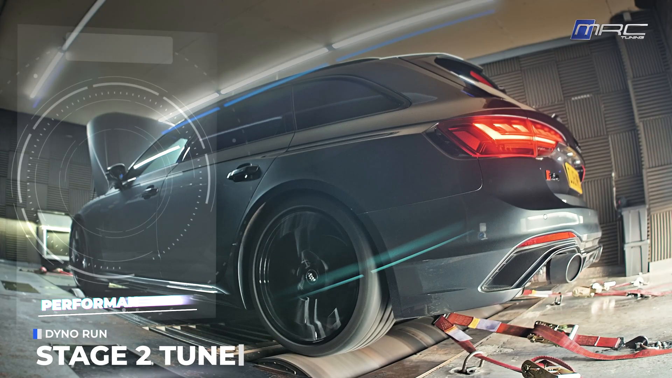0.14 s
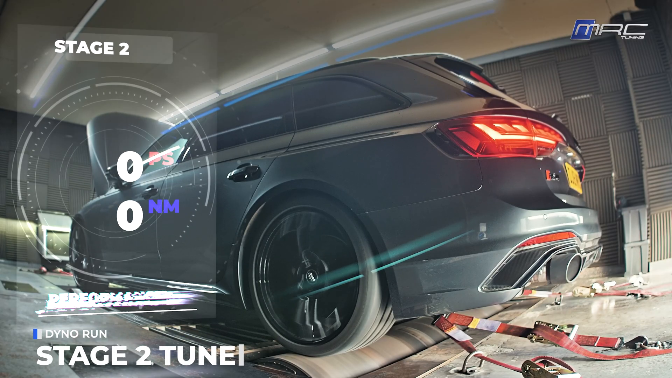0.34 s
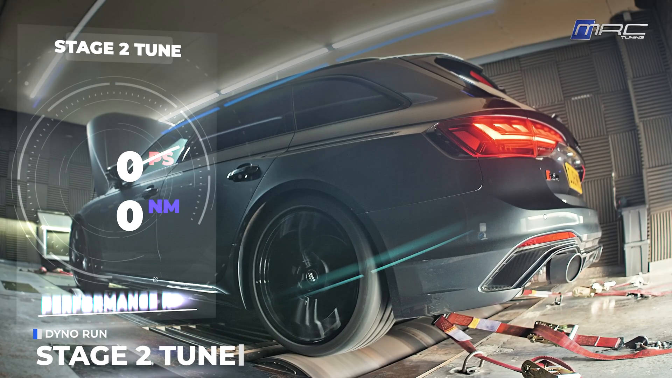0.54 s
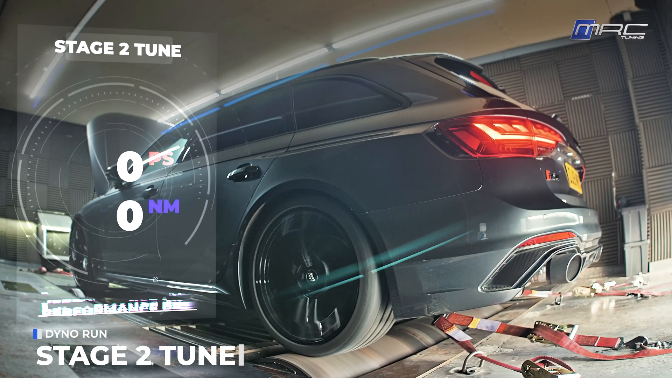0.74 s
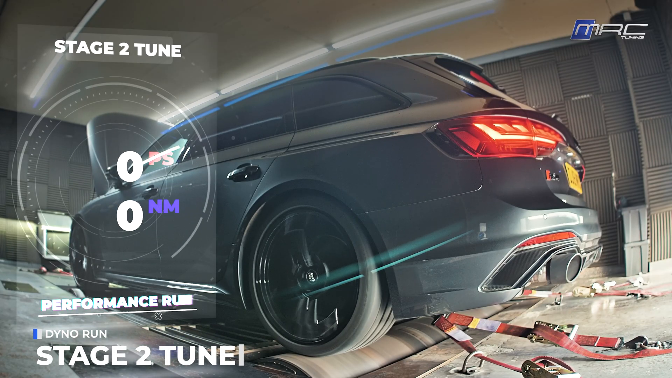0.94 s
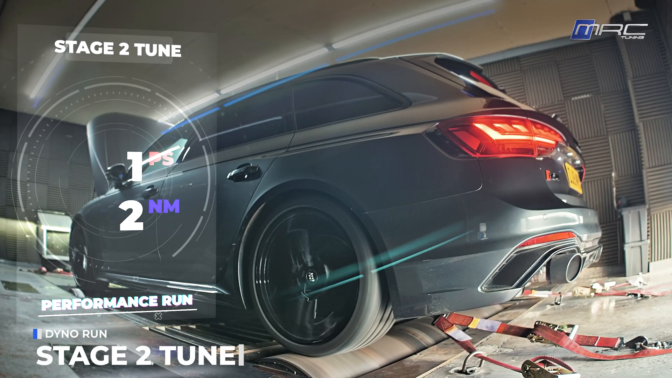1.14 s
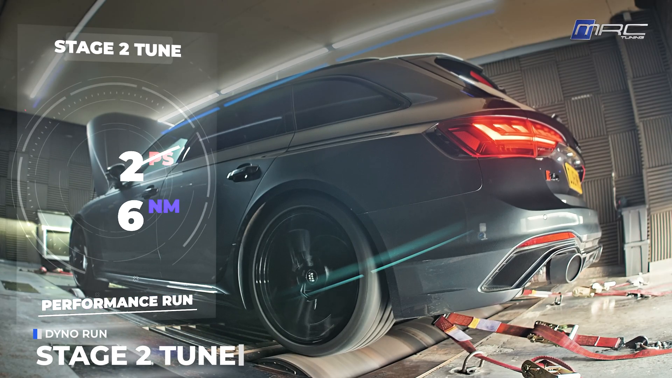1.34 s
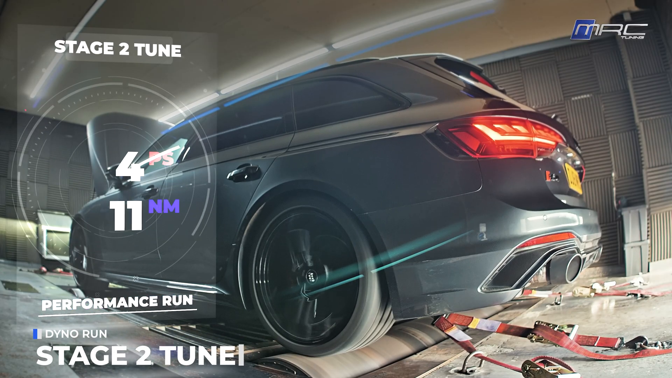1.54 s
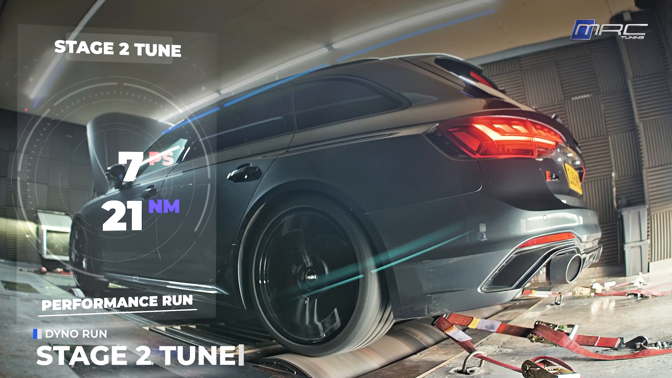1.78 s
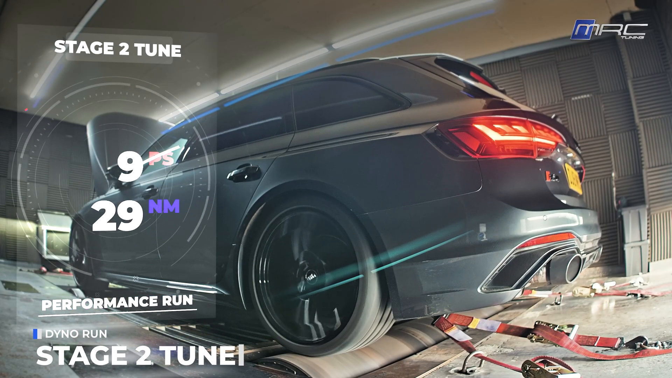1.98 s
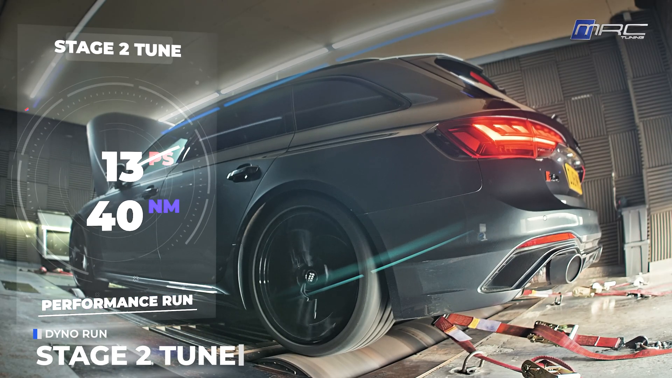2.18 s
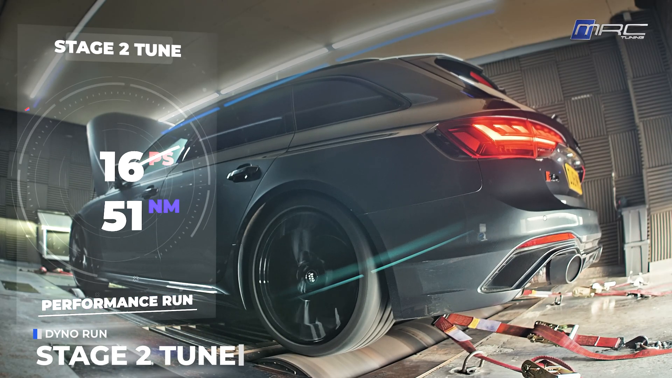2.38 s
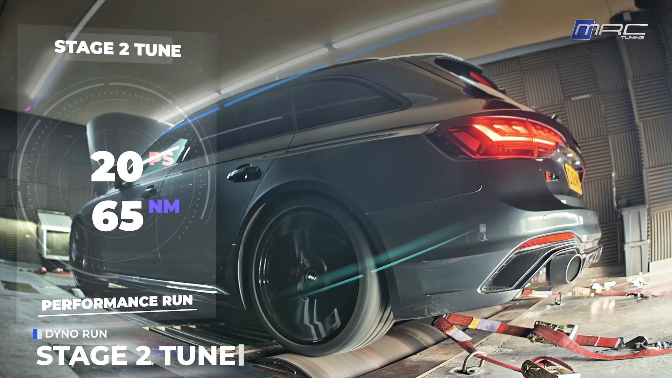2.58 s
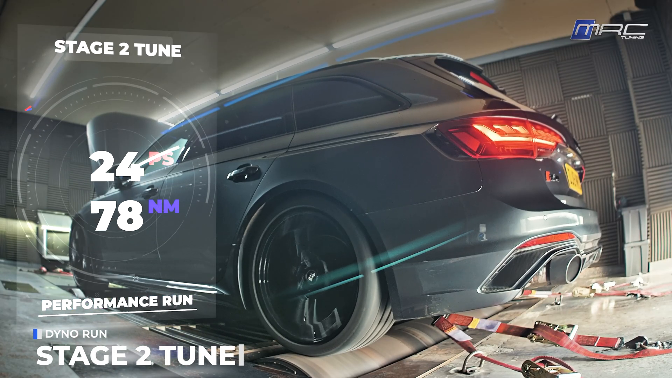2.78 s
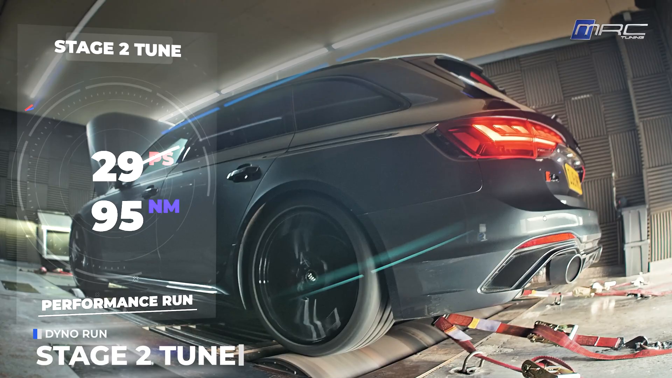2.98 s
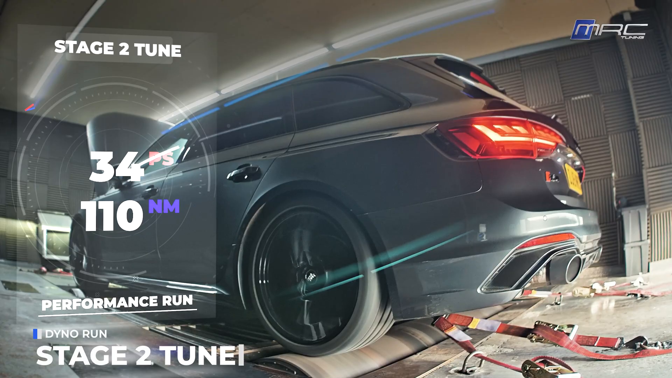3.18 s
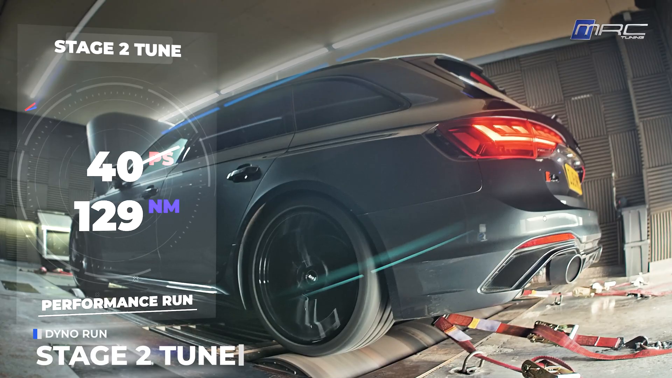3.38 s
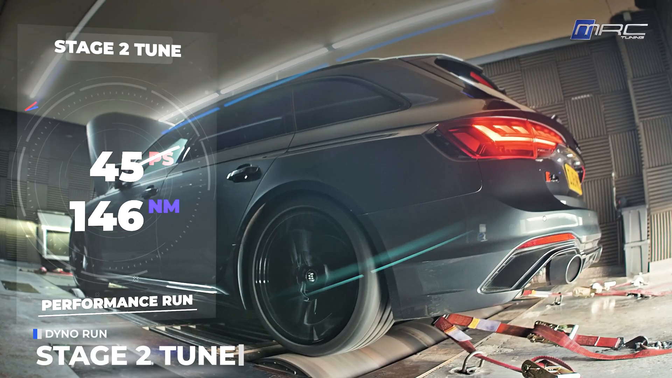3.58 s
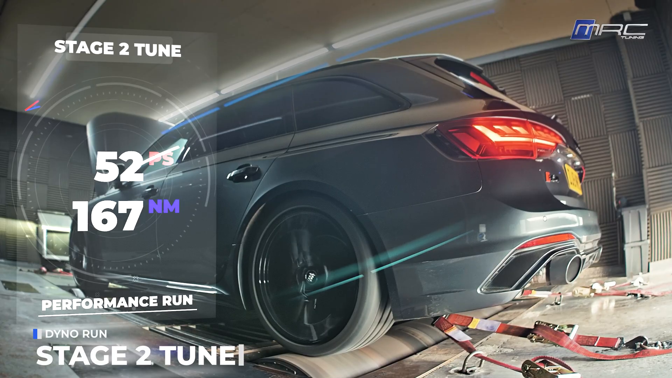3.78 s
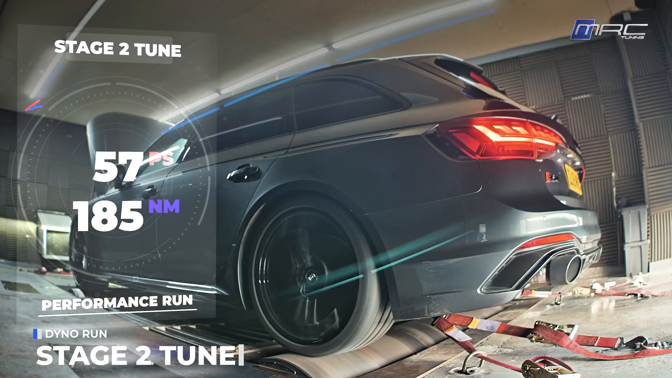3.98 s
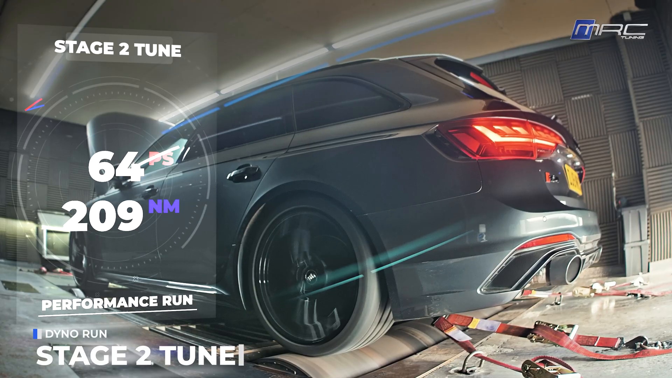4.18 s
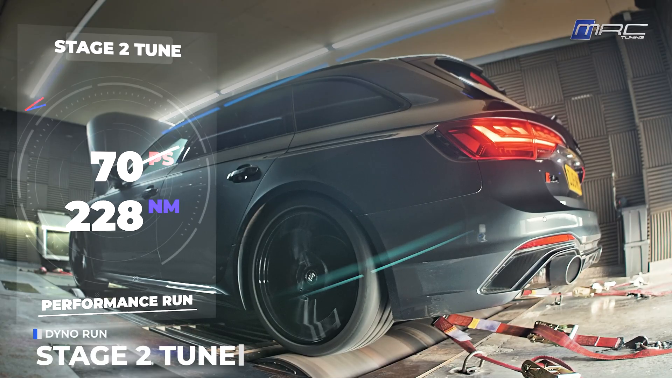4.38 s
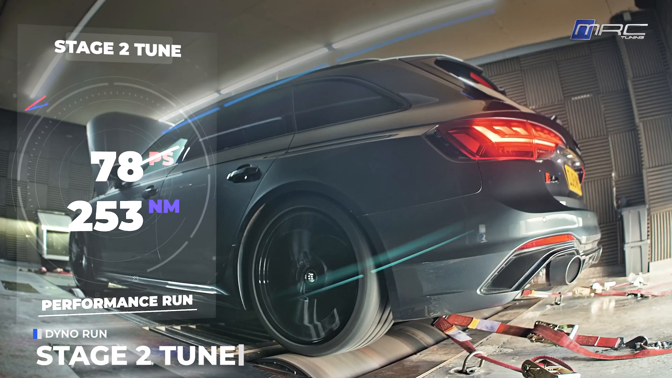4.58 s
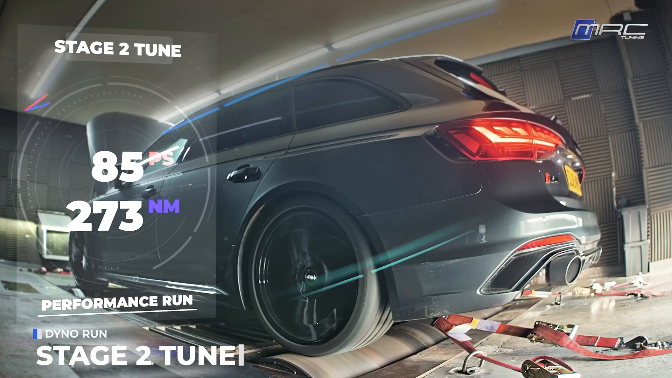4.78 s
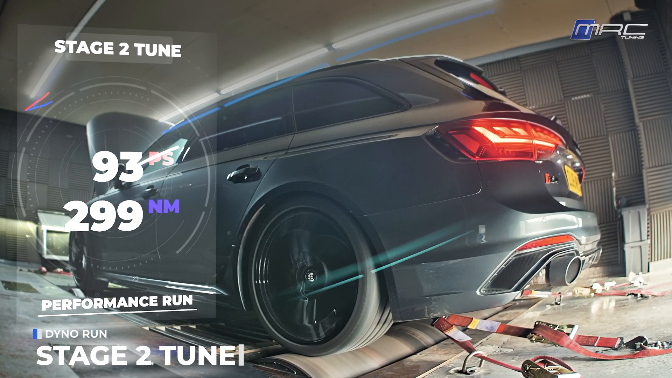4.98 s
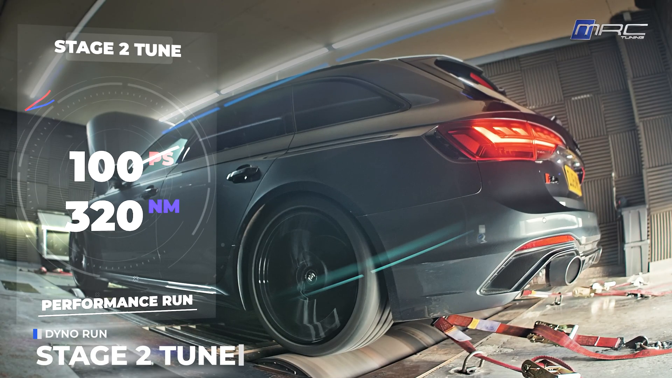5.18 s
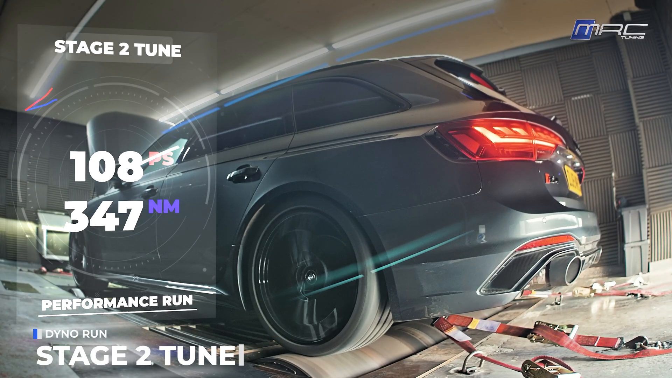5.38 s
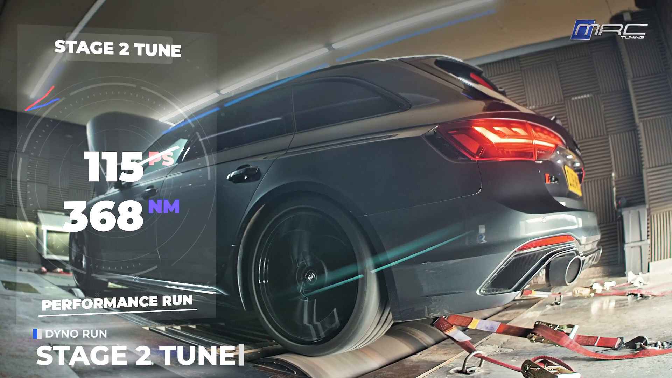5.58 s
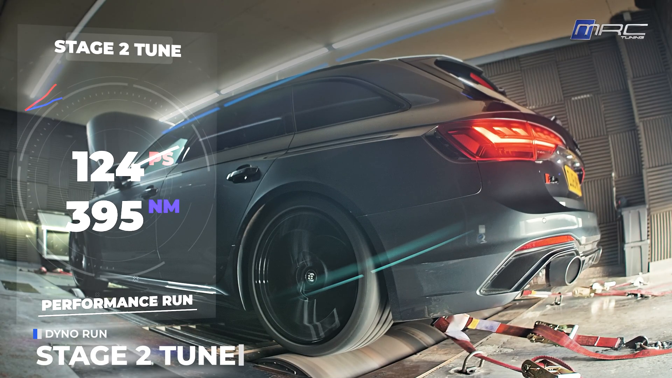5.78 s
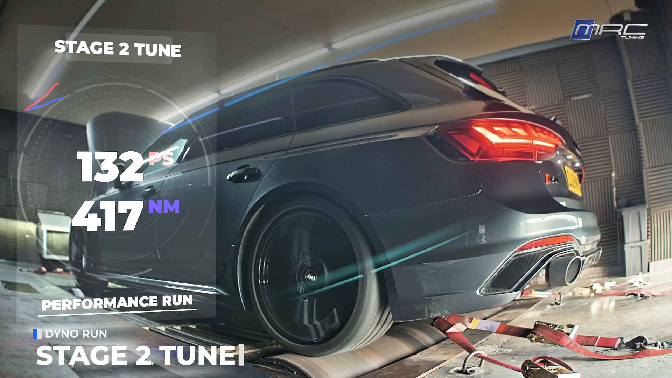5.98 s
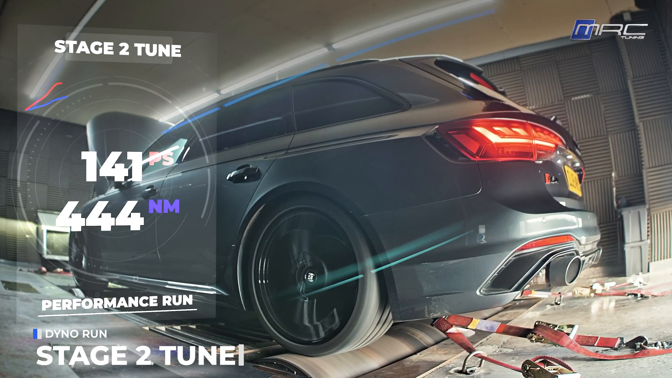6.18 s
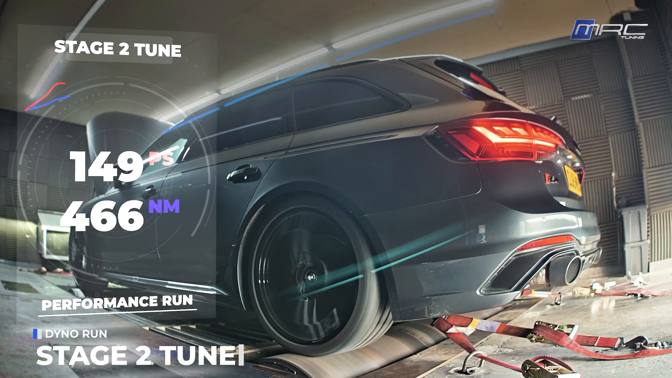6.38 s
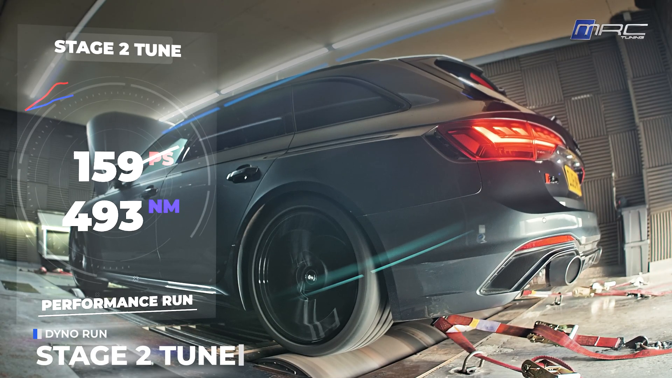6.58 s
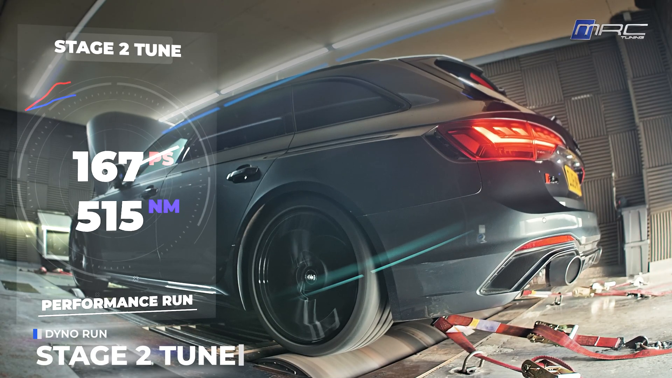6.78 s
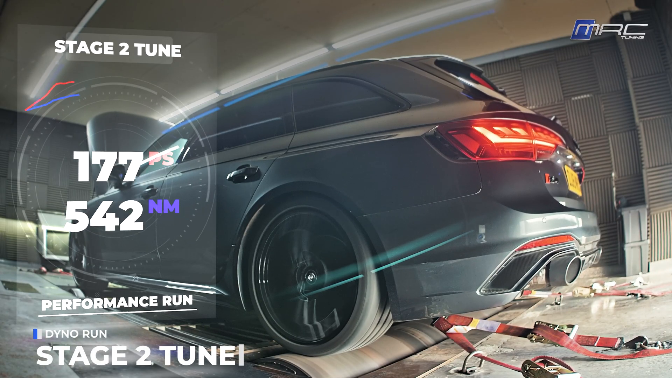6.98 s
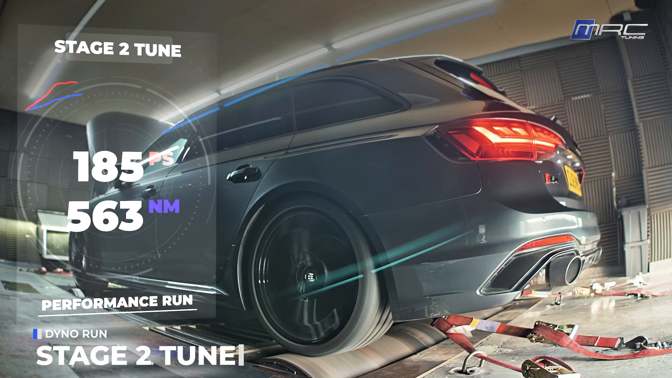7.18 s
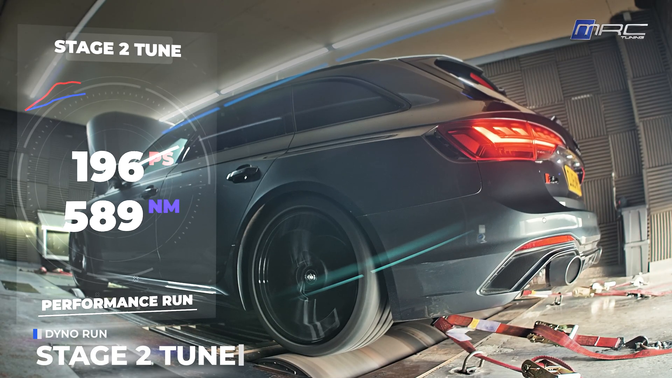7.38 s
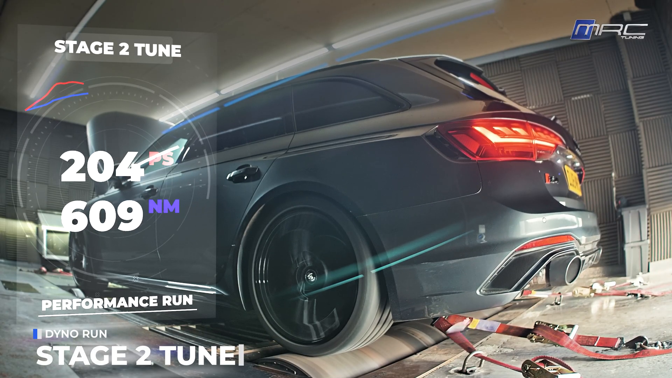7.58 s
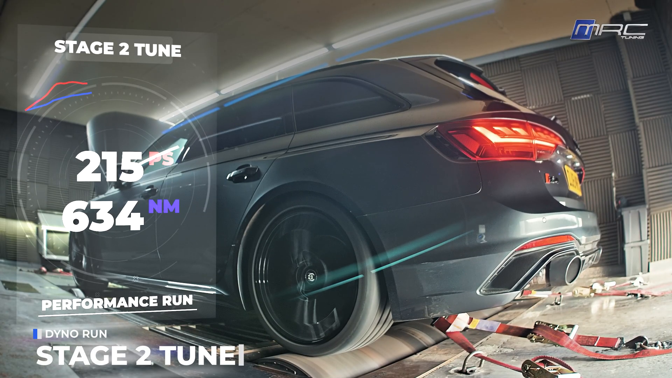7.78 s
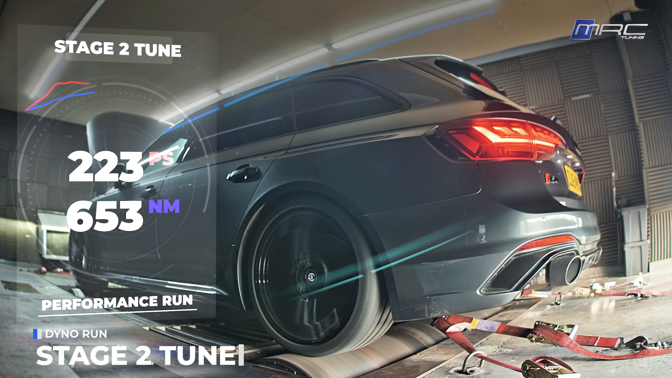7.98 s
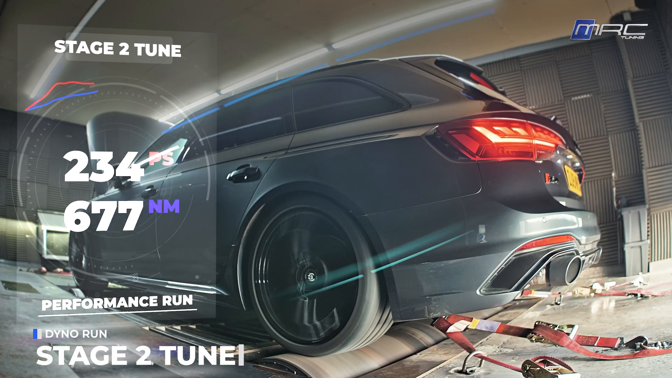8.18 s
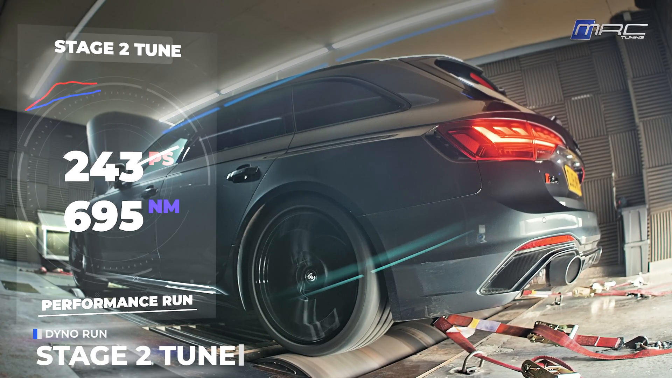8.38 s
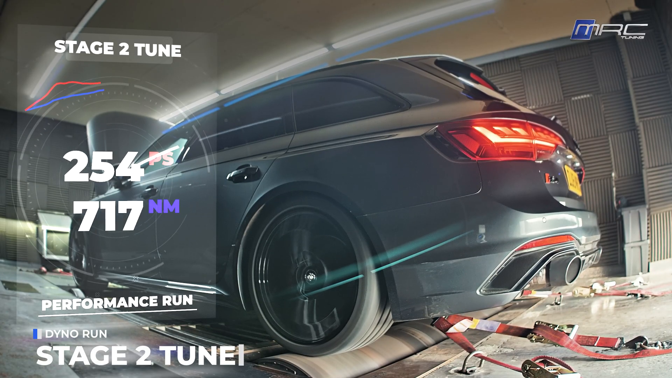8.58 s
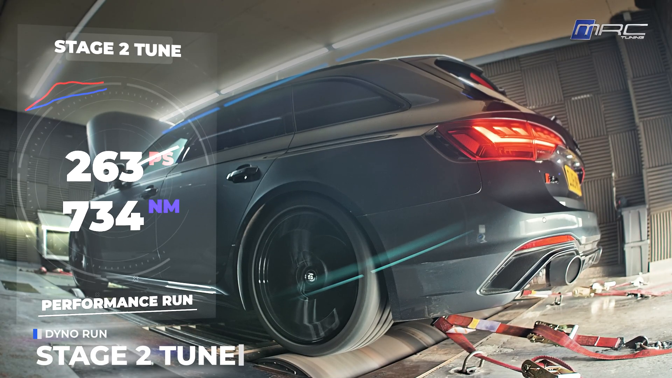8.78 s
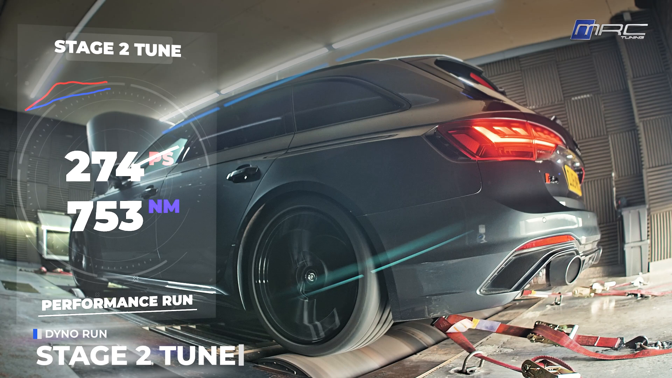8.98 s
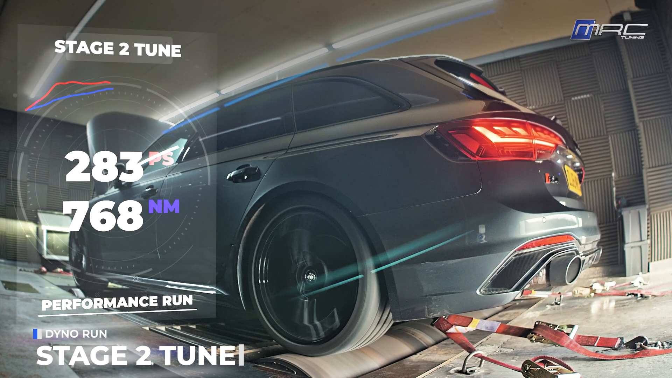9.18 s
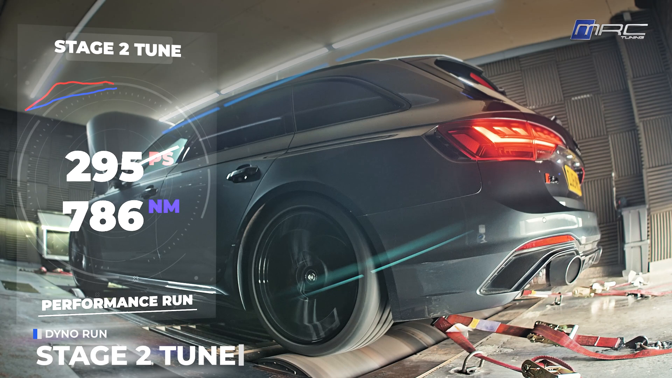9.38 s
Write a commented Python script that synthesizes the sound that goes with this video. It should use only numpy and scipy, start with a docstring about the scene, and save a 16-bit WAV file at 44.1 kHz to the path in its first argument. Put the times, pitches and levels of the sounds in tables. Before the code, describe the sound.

Close behind a car strapped to rollers in a padded test cell, cooling fans rush steadily over a low, uneven exhaust burble. After about a second the throttle opens; the engine digs in low, then climbs smoothly in pitch. The boom swells and dips through resonances, gear whine rises, tyres drone hollowly, and gas rasp thickens into a loud roar that is still climbing at the end.

```python
"""In a padded test cell, a turbocharged six-cylinder car runs on a closed throttle, then pulls hard with rising pitch.
Its exhaust boom is a set of tones tied to the firing rate, which swell and sink at the resonances of pipe and cell.
Filtered noise and a repeating ragged pattern make a rasp of gas that grows with the flow; the cell adds a short ring.
Shaped noise makes cooling fans, silencer burble and tyre drone; a gear whine climbs with the speed.
Two thin whistles hold their pitch, and two small ticks are brief bursts of ringing noise."""
import sys
import numpy as np
from scipy import signal
from scipy.fft import rfft, irfft
from scipy.io import wavfile
from scipy.ndimage import uniform_filter1d, map_coordinates

SR = 44100
rng = np.random.default_rng(int(sys.argv[2]) if len(sys.argv) > 2 else 0)


def output_pcm(signal):
    """Save a mono or channel-first signal as 16-bit PCM at the path in sys.argv[1].

    Samples are clipped to [-1, 1] before scaling.
    """
    pcm = np.clip(np.atleast_2d(signal).T, -1, 1) * 32767
    wavfile.write(sys.argv[1], SR, np.round(pcm).astype(np.int16))


N = 416304
TIME = np.arange(N) / SR  # seconds
BINS_HZ = np.fft.rfftfreq(N, 1 / SR)
CYLINDERS = 6

# Speed of the engine. Each row: time in seconds, firing rate in Hz.
SPEED = [(0, 64), (1.55, 64.3), (2, 67.9), (2.4, 71.5), (2.8, 75.7), (3.2, 80.2), (3.6, 85.9), (4, 92.4),
         (4.4, 100.6), (4.8, 109.5), (5.4, 124.2), (6, 140.8), (6.8, 160.2), (7.6, 179.5), (8, 188.6),
         (8.5, 200.5), (9, 211.7), (9.44, 222)]
# Strength of the firing pulses. Each row: time in seconds, level in dB.
LOAD = [(1.4, -26), (1.6, -27), (1.8, -22), (2.4, -25.5), (3.0, -30.5), (3.8, -26), (4.6, -16.5),
        (5.4, -12), (6.2, -6), (6.6, -10.9), (7.5, -9.5), (8.3, -2.5), (9.44, -1)]
# Gas flow through the exhaust, with a surge as boost arrives. Each row: time in seconds, dB against full power.
FLOW = [(1.2, -36), (1.9, -27.5), (2.3, -22.5), (3, -20), (3.8, -17.5), (4.2, -14.5), (5, -10.5),
        (5.25, -10), (5.4, -7), (5.55, -8.5), (6.1, -6.5), (6.6, -8.5), (7.2, -5.5), (8.1, -3),
        (8.55, -1.5), (8.9, 0.5), (9.15, -0.5), (9.44, 1.5)]
# The throttle opens in a quick push that ends at OPEN_S.
OPEN_S, PUSH_S = 1.37, 0.069  # seconds
# The turbo starts to spool at SPOOL_S and takes SPOOL_LENGTH_S to reach full boost.
SPOOL_S, SPOOL_LENGTH_S = 3.65, 1.56  # seconds

# Colour of the cooling fans. Each row: frequency in Hz, relative level in dB per Hz.
FAN = [(35, -55), (65, -9), (170, 2.5), (280, -7.5), (390, -5.5), (580, -12), (820, -22.5), (1150, -25),
       (1500, -22.5), (2700, -23), (4300, -30.5), (6300, -42.5), (8500, -53), (13000, -62.5)]
FAN_DB = -37.5  # overall rms level
# Uneven burble of the silencer. Each row: time in seconds, level in dB.
BURBLE = [(0, -37), (.7, -37.5), (1.25, -46), (1.7, -44), (3, -57)]
# Strong firing orders (multiples of the firing rate); load, pipe and cell are added to the last two levels.
# Each row: multiple of the firing rate, dB with the throttle closed, dB off boost, dB on boost.
ORDERS = [(1, -51, -9, -24.5), (2, -39.5, -23.5, -24.5), (3, -56, -29, -24.1), (4, -63, -25.5, -27.5)]
# Standing waves of pipe and cell, which lift any firing order that sweeps through them.
# Each row: centre in Hz, width in Hz, lift in dB.
STANDING_WAVES = [(77.2, 12, 16.5), (88.9, 16.5, 15), (112.7, 29, 14.5), (131.7, 13.7, 8), (144.7, 23, 15),
                  (169.9, 37.3, 24.5), (198.5, 17.5, 9), (217.7, 7.1, 8), (243.8, 12.3, 13),
                  (331.4, 36, 12), (383.4, 14, 10.5), (428, 14, 5), (552.6, 12, 9), (840.7, 40, 9.5)]
# Pitches where the firing pulses and their reflections cancel. Each row: centre in Hz, width in Hz, change in dB.
NULLS = [(75.5, 4.25, -21.5), (111.9, 2.5, -12), (117.9, 2.4, -7), (123.8, 2.3, -18.5), (156.2, 3.2, -2.5),
         (168.34, 5, -25.5), (189.3, 7.4, -9), (199.86, 3.2, -27.5), (209.1, 1.8, -20.5),
         (237.4, 5.3, -20.5), (344.4, 4.9, -17), (370.5, 11.9, -30.5), (583.6, 12.6, -19.5),
         (773, 12, -8.5)]
# Resonances of tailpipe and cell; each sound scales the lift by its own contrast.
# Each row: centre in Hz, width in Hz, lift in dB before that scaling.
PIPE = [(336, 42, 6), (409, 45, 17.5), (545.3, 47, 10.5), (647.4, 29, 13.5), (723, 21, 9), (842, 18, 9.5),
        (901, 43, 8.5), (1136, 45, 4), (1303, 45, 3), (2106, 410, 5.5), (2530, 110, 4.5), (2940, 250, 3),
        (4210, 450, 8), (5220, 580, 7.5), (7200, 400, 2), (12040, 500, 10)]
# Lines between the firing orders, from unequal banks and cylinders; load and pipe are added to the levels.
# Each row: multiple of the firing rate, dB off boost, dB on boost.
SUBORDERS = [(1 / 2, -42, -33), (2 / 3, -40, -39), (3 / 2, -31.5, -34)]
# Resonances of one bank's pipe, which lift those lines. Each row: centre in Hz, width in Hz, lift in dB.
BANK_PIPE = [(71.4, 14, 14), (106.7, 17, 6.5), (143.3, 10, 15), (165.4, 16, 20.5), (202, 13, 7.5),
             (264, 6.5, 7)]
# Drone of the tyres on the rollers. Each row: time in seconds, level in dB.
TYRES = [(0, -54.5), (1.5, -51), (2.5, -41), (3.2, -43.5), (4.4, -39.5), (5.5, -36), (9.44, -45.5)]
# Tones of the gears, before the housing and the throttle change their levels.
# Each row: multiple of the mesh rate, dB off boost, dB on boost, fuzzy share from 0 to 1.
GEAR = [(1, -57, -54.5, .12), (2, -66, -57.5, .4), (4, -75, -92, .6)]
# Gear mesh, which slips a little against the engine. Each row: time in seconds, mesh cycles per firing.
MESH = [(1.5, 20.87), (2.2, 21.03), (3.2, 21.04), (4, 20.8), (4.5, 20.65), (6.3, 20.83), (8.4, 20.92),
        (9.44, 20.88)]
# Resonances and dead spots of the gear housing. Each row: centre in Hz, width in Hz, change in dB.
HOUSING = [(1340, 110, -7), (1500, 300, 5), (2050, 500, 4), (2550, 400, -4), (3080, 300, 6),
           (3900, 900, -3), (5200, 1000, -6), (6250, 500, 4), (7350, 700, 6), (7880, 300, -14),
           (9000, 1200, 2)]
# Two thin whistles of steady pitch.
# Each row: pitch in Hz, dB with the throttle closed, dB at full flow, extra dB at the top of the flare.
WHISTLES = [(8269, -85, -58, 7), (9647, -92, -61.5, 0)]
# The lower whistle flares up late in the pull, and settles again.
FLARE_S, FLARE_DECAY_S = 7.72, .6  # seconds
# Sharpness of the firing pulses. Each row: time in seconds, dB added to the higher orders.
SHARPNESS = [(1.3, -78), (2.3, -58), (2.85, -50.5), (3.3, -66), (4.3, -69.5), (5.3, -42.5), (6.1, -38.5),
             (6.8, -53.5), (7.5, -33.5), (8.1, -37.5), (8.8, -32), (9.44, -26.5)]
# First echoes off floor, car body and wall. Each row: delay in seconds, gain.
ECHOES = [(.0021, -0.048), (.0047, -0.14), (.0083, .12)]
# Boom, body, rasp, hiss and fizz of the gas.
# Each row: lower edge in Hz, share from 0 to 1 that repeats every engine cycle (before boost scales it),
# dB at full flow, dB per dB of flow, sputter in dB.
BANDS = [(20, 0.86, -30, 0.4, 0.8), (260, 0.7, -27, 1.07, 1.24), (990, 0.56, -29, 1, 1.1),
         (3200, .7, -35, 1.11, 1.57), (8050, 0, -46, 1.86, 2.5)]
# Colour of the exhaust gas, before each band is set to its own level. Each row: frequency in Hz, dB per Hz.
EXHAUST = [(42, -40.5), (66, -4.5), (150, 6), (270, -14.5), (450, -14), (860, -10.5), (1040, -17.5),
           (1400, -16.5), (1750, -21.5), (2250, -19.5), (4900, -28), (6800, -37), (10300, -44.5),
           (12500, -45)]
# Small metallic ticks. Each row: start in seconds, level in dB, pitch in Hz, width in Hz, decay in seconds.
TICKS = [(4.405, -41, 4150, 300, .006), (5.369, -47, 9000, 7360, .004)]
EDGE_HZ = 13250  # upper limit of the whole sound


def amp(db):
    """Turns decibels into gain."""
    return 10 ** (np.asarray(db) / 20)


def evened(x):
    """Scales a signal to rms 1."""
    return x / np.sqrt(np.mean(x ** 2) + 1e-20)


def curve(rows, axis=1):
    """Reads one column of a time table at every sample."""
    rows = np.array(rows, float)
    return np.interp(TIME, rows[:, 0], rows[:, axis])


def read(points, hz):
    """Reads a spectrum in dB, joined by straight lines over log frequency."""
    f, db = np.transpose(points)
    return np.interp(np.log(hz + 1), np.log(f + 1), db)


def wander(rate_hz):
    """Makes a smooth random signal of rms 1 that changes up to about rate_hz."""
    return evened(irfft(rfft(rng.standard_normal(N)) / (1 + (BINS_HZ / rate_hz) ** 4), N))


def ring(x, hz, width_hz):
    """Passes a signal through one resonance."""
    r = np.exp(-np.pi * width_hz / SR)
    return signal.lfilter([1, 0, -1], [1, -2 * r * np.cos(2 * np.pi * hz / SR), r * r], x)


def lift_db(resonances, hz):
    """Adds up the lift or loss that a set of resonances gives at each frequency."""
    return sum(db / (1 + (2 * (hz - f) / width) ** 2) for f, width, db in resonances)


def throttle():
    """Gives 0 while the throttle is closed and 1 when it is open."""
    return np.clip((TIME - OPEN_S) / PUSH_S + 1, 0, 1)


def boosted(off_db, on_db):
    """Moves a value from its first to its second setting as the turbo spools up."""
    return off_db + (on_db - off_db) * np.clip((TIME - SPOOL_S) / SPOOL_LENGTH_S, 0, 1)


def crowded_modes(hz, depth, spacing_hz=14, above_hz=300):
    """The cell's higher modes lie close together, so a rising tone flickers in and out among them."""
    grid = np.arange(0, SR / 2, spacing_hz)
    random_rows = rng.standard_normal((2, len(grid)))
    # smooth curves through random points stand for the two parts of a complex gain
    re, im = (map_coordinates(row, [hz / spacing_hz], order=3) for row in random_rows)
    share = depth / (1 + (above_hz / hz) ** 4)
    return np.hypot(1 + share * re, share * im) / np.sqrt(1 + 2 * share ** 2)


def fans():
    """The steady rush of cooling air is noise with a fixed colour."""
    rush = irfft(rfft(rng.standard_normal(N)) * amp(read(FAN, BINS_HZ)), N)
    return amp(FAN_DB) * evened(rush)


def burble(hz=128, width_hz=38):
    """Noise rings the silencer twice over; this burble fades once the throttle is open."""
    once = ring(rng.standard_normal(N), hz, width_hz)
    return evened(ring(once, hz, width_hz)) * amp(curve(BURBLE))


def firing_orders(firings, flutter=0.04, sway=0.011, lag=0.689, contrast=0.34):
    """The clean exhaust boom adds up firing orders, each coloured by the standing waves it passes."""
    rate = curve(SPEED)
    phase = 2 * np.pi * firings + sway * wander(25)
    opened = throttle()
    boom = np.zeros(N)
    for multiple, closed_db, off_db, on_db in ORDERS:
        k = round(multiple)
        hz = k * rate
        path_db = lift_db(STANDING_WAVES, hz) + lift_db(NULLS, hz) + contrast * lift_db(PIPE, hz)
        pulling = amp(curve(LOAD) + boosted(off_db, on_db) + path_db) * crowded_modes(hz, depth=0.36)
        level = opened * pulling + (1 - opened) * amp(closed_db)
        boom += level * np.cos(k * phase - lag * k * k)
    return boom * (1 + flutter * wander(26))


def suborders(firings, flutter=0.058):
    """The growl under and between the firing orders swells as each line crosses a resonance."""
    rate = curve(SPEED)
    growl = np.zeros(N)
    for multiple, off_db, on_db in SUBORDERS:
        level_db = curve(LOAD) + boosted(off_db, on_db) + lift_db(BANK_PIPE, multiple * rate)
        growl += amp(level_db) * np.cos(2 * np.pi * (multiple * firings + rng.random()))
    return growl * (1 + flutter * wander(21))


def tyres(hz=430, width_hz=170):
    """Tread on the steel rollers is heard as a hollow drone: noise through one resonance, twice."""
    once = ring(rng.standard_normal(N), hz, width_hz)
    return evened(ring(once, hz, width_hz)) * amp(curve(TYRES))


def gear_whine(throttle_db=-3):
    """The mesh tone and its multiples climb through the housing's resonances, louder with the throttle open."""
    mesh_hz = curve(SPEED) * curve(MESH)
    phase = 2 * np.pi * np.cumsum(mesh_hz) / SR
    whine = np.zeros(N)
    for multiple, off_db, on_db, fuzzy in GEAR:
        k, fuzzy = round(multiple), np.clip(fuzzy, 0, 1)
        spread_hz = 14 * k
        # random sway of both phases smears the tone into a narrow band
        fuzz = wander(spread_hz) * np.cos(k * phase) + wander(spread_hz) * np.sin(k * phase)
        tone = np.sqrt(2 * (1 - fuzzy)) * np.cos(k * phase) + np.sqrt(fuzzy) * fuzz
        whine += amp(boosted(off_db, on_db) + lift_db(HOUSING, k * mesh_hz)) * tone
    # 1.5 times throttle_db while closed, half of it when open
    return whine * amp(throttle_db * (1.5 - throttle()))


def whistles(flutter=.12, per_flow=1.07):
    """Thin, high sine tones of fixed pitch grow with the flow."""
    rise = np.clip((TIME - FLARE_S) / .02 + 1, 0, 1)
    flare = rise * np.exp(-abs(TIME - FLARE_S) / FLARE_DECAY_S)
    out = np.zeros(N)
    for hz, closed_db, full_db, flare_db in WHISTLES:
        flowing_db = full_db + per_flow * curve(FLOW) + flare_db * flare
        level = np.hypot(amp(closed_db), amp(flowing_db))
        out += level * np.sin(2 * np.pi * hz * TIME) * (1 + flutter * wander(20))
    return np.sqrt(2) * out  # so that the levels are rms


def overtones(firings, knee_hz=850, fall=2.8, sway=0.034, contrast=1.09, scatter=0.87, count=13):
    """Higher firing orders, from the 5th up, light up one after another as they cross the pipe's resonances."""
    rate = curve(SPEED)
    phase = 2 * np.pi * firings + sway * wander(25)
    treble_loss = np.sqrt(1 + (BINS_HZ / knee_hz) ** (2 * fall))
    response = amp(contrast * lift_db(PIPE, BINS_HZ)) / treble_loss
    response = response * crowded_modes(BINS_HZ + 1, depth=0.44, spacing_hz=20)
    lines = np.zeros(N)
    for k in range(5, count):
        level = np.interp(k * rate, BINS_HZ, response)
        lines += level * np.cos(k * phase + scatter * rng.standard_normal())
    return lines * amp(curve(SHARPNESS))


def cell(x, wet_db, t60=0.21):
    """The test cell adds first echoes and a short diffuse ring, which falls 60 dB in t60 seconds."""
    t = TIME[:SR // 2]
    tail = rng.standard_normal(len(t)) * amp(-60 * t / t60) * (t > .003)
    response = amp(wet_db) * tail / np.linalg.norm(tail)
    response[0] = 1  # direct sound
    for delay, gain in ECHOES:
        response[round(delay * SR)] += gain
    return signal.oaconvolve(x, response)[:N]


def cycle_pattern(firings, size=4096, count=400):
    """Unequal cylinders repeat one ragged pressure shape per engine cycle, mostly lines between the firing orders."""
    k = np.arange(count)
    # the first four firing orders are left out
    kept = (k % CYLINDERS > 0) | (k > 4 * CYLINDERS)
    shape = irfft(kept * np.exp(2j * np.pi * rng.random(count)), size)
    place = firings / CYLINDERS % 1 * size
    return evened(np.interp(place, np.arange(size), shape) * np.sqrt(curve(SPEED)))


def roar(firings, pulsing=0.24, resonant=0.7, sputter_hz=130, locking=0.71):
    """Puffs of turbulent gas and the cycle pattern leave the pipe; the pattern's share grows as boost builds."""
    puffs = rng.standard_normal(N) * (1 + pulsing * np.cos(2 * np.pi * firings))
    colour = amp(read(EXHAUST, BINS_HZ) + resonant * lift_db(PIPE, BINS_HZ))
    loose = rfft(cell(puffs, wet_db=-3.5)) * colour
    locked = rfft(cell(cycle_pattern(firings), wet_db=-4.0)) * colour
    edges = [row[0] for row in BANDS] + [SR]
    below = [1 / (1 + (BINS_HZ / hz) ** 16) for hz in edges]
    flow_db = curve(FLOW)
    out = np.zeros(N)
    for k, (_, repeats, full_db, per_flow, sputter_db) in enumerate(BANDS):
        band = below[k + 1] - below[k]
        share = np.clip(repeats * boosted(0, locking), 0, 1)
        loose_gas = np.sqrt(1 - share) * evened(irfft(loose * band, N))
        locked_gas = np.sqrt(share) * evened(irfft(locked * band, N))
        gas = loose_gas + locked_gas
        # even out slow level changes over a third of a second
        steady = gas / np.sqrt(uniform_filter1d(gas ** 2, SR // 3))
        # each band sputters on its own and grows with the flow at its own pace
        out += steady * amp(full_db + per_flow * flow_db + sputter_db * wander(sputter_hz))
    return out * throttle()


def ticks():
    """Each tick is a brief burst of noise in one resonance."""
    out = np.zeros(N)
    for s, db, hz, width_hz, decay in TICKS:
        ringing = evened(ring(rng.standard_normal(N), hz, width_hz))
        out += amp(db) * ringing * (TIME >= s) * np.exp(-abs(TIME - s) / decay)
    return out


def scene():
    """Adds all sources; one running count of firings drives the tones and roar of the exhaust."""
    firings = np.cumsum(curve(SPEED)) / SR
    exhaust = burble() + firing_orders(firings) + suborders(firings) + overtones(firings) + roar(firings)
    return (fans() + exhaust + tyres() + gear_whine() + whistles() + ticks())[None]


def record(dry):
    """Cuts the treble steeply above EDGE_HZ."""
    lowpass = signal.firwin(801, EDGE_HZ, window=("kaiser", 9), fs=SR)
    return signal.oaconvolve(dry, lowpass[None], "same")


dry = scene()
out = record(dry)
output_pcm(out)
```